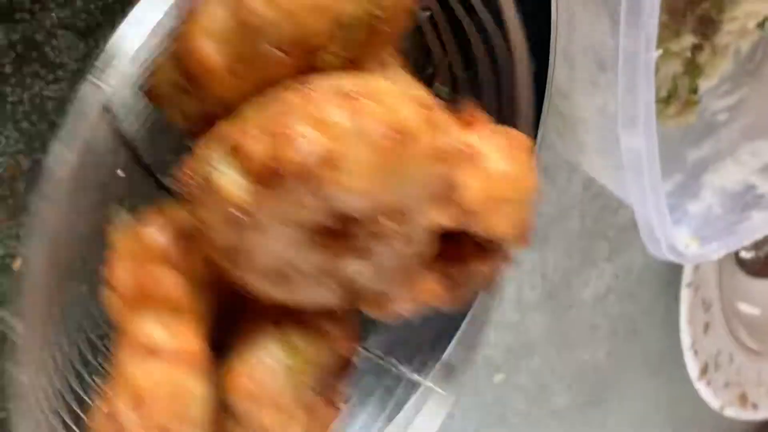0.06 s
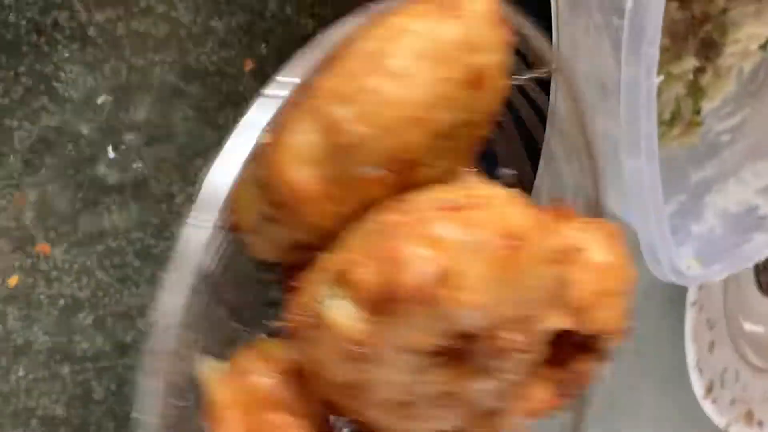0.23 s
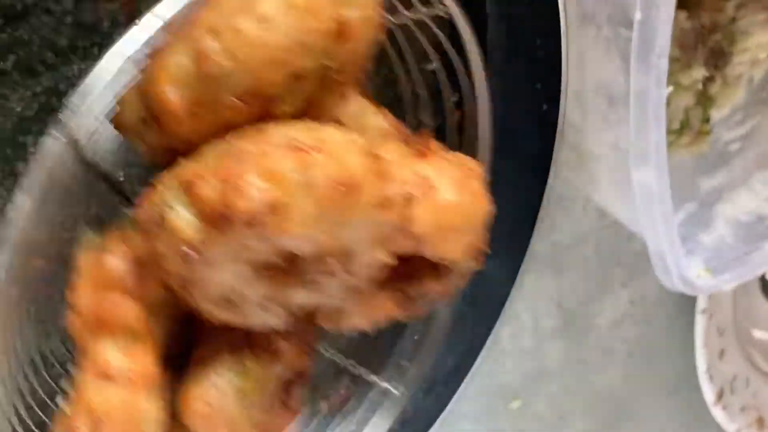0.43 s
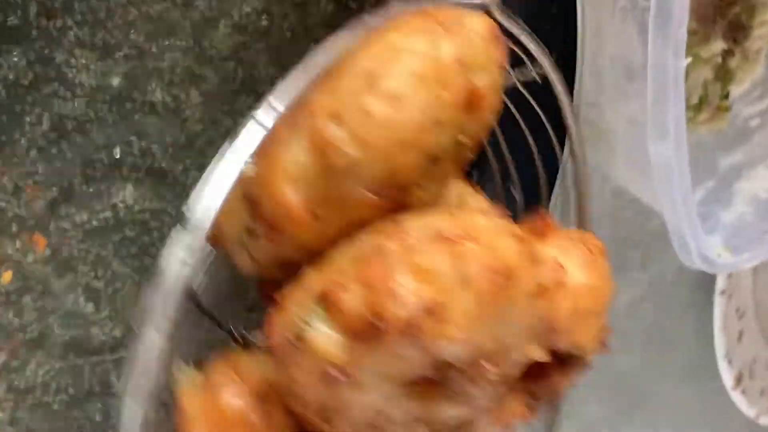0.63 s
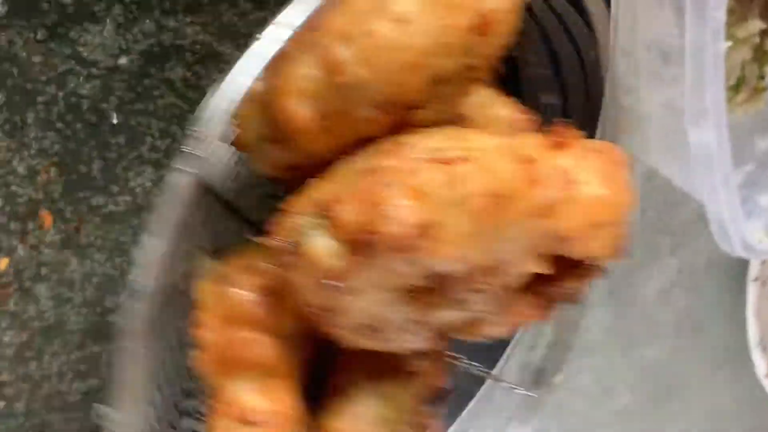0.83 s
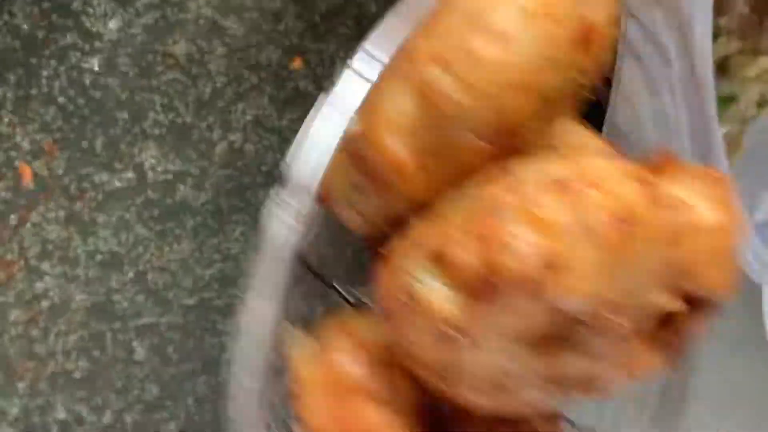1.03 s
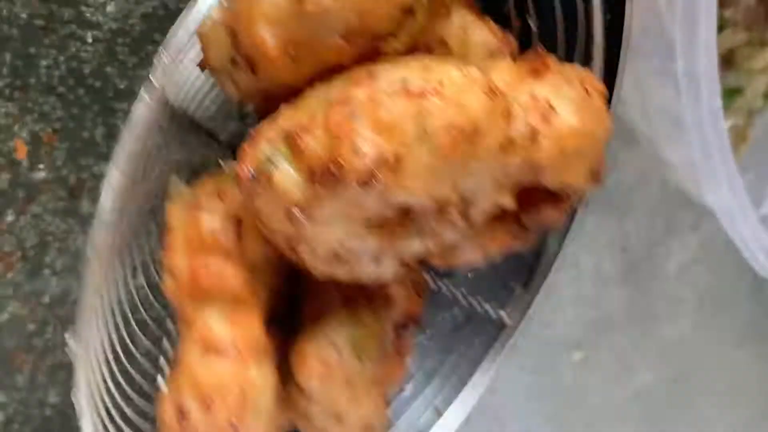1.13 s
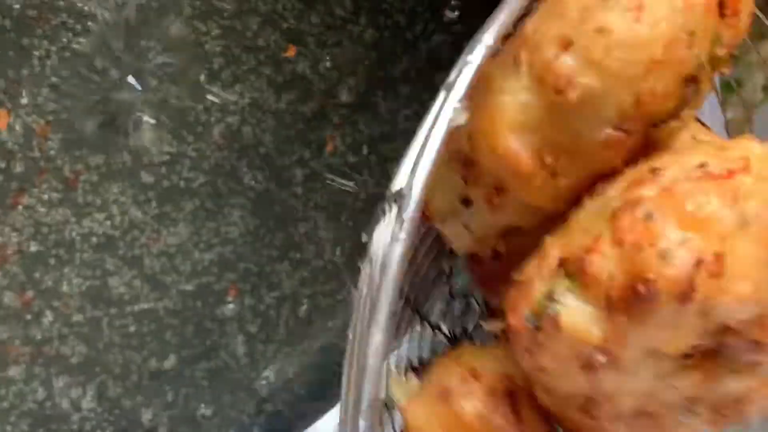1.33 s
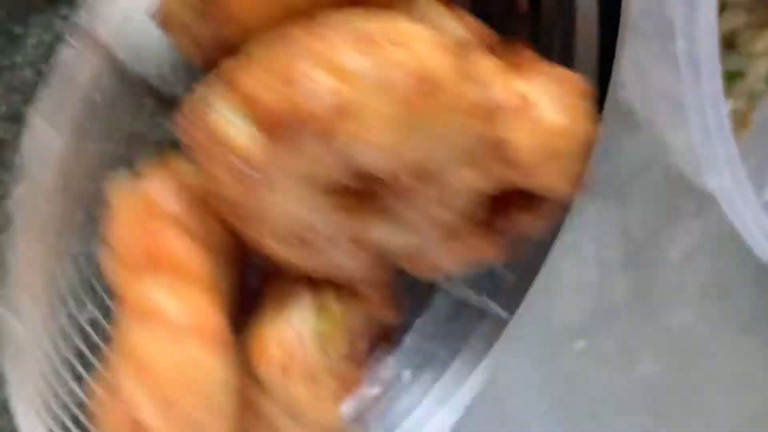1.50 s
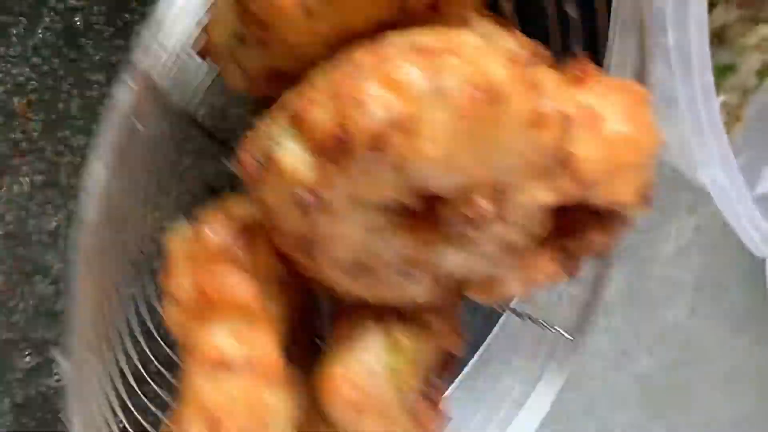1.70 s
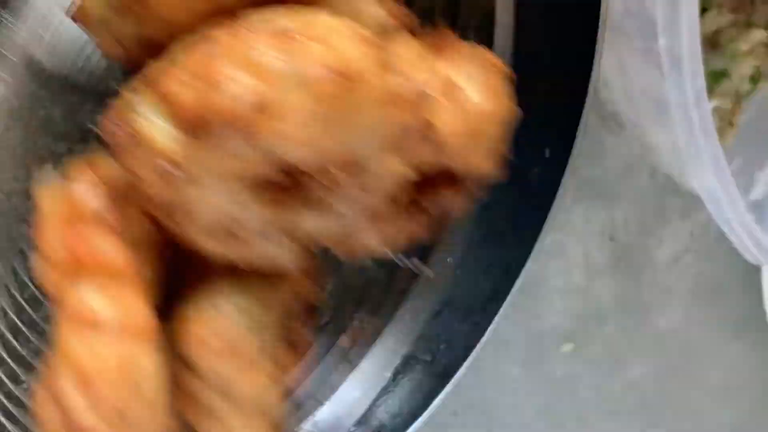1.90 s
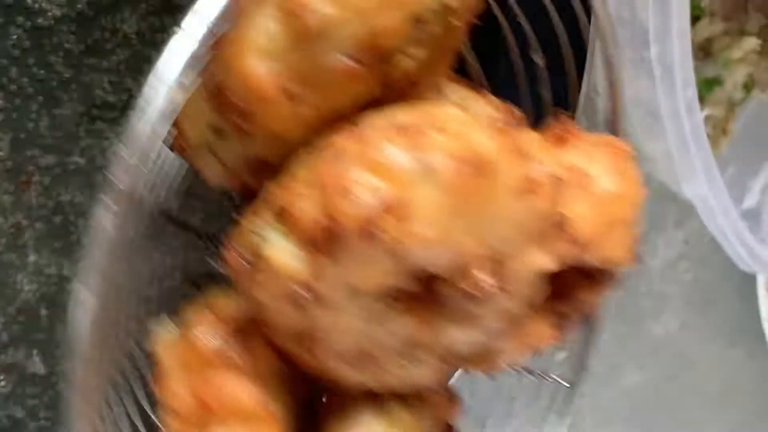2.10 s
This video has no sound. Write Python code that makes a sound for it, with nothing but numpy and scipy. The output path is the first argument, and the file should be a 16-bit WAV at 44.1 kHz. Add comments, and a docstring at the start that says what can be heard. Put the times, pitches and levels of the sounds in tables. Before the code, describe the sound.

A wire strainer clanks on a frying pan's rim at about 0.2 seconds, close by, then chatters and settles by 0.5 seconds, ringing briefly with a small kitchen's echo. A quiet low rush, probably the burner, runs throughout. Faint oil hiss swells around 0.9 seconds, and a short, soft rustle comes at 1.4. Near 1.9 seconds a faint thin whine grows slightly and sinks back.

```python
"""A small kitchen, heard by two close microphones: a low rush, probably the burner, and hissing oil.
At 0.2 s a wire strainer full of fritters knocks on the rim of a frying pan, chatters and settles.
The pan rings low, the wires ring high, and the room carries both for a moment.
The hot oil swells now and then from about 0.9 s, and at 1.4 s comes one brief rustle.
Near the end, a thin whine in the rush grows a little louder and sinks back."""
import sys
import numpy as np
from scipy import signal
from scipy.fft import rfft, irfft, next_fast_len
from scipy.io import wavfile
from scipy.ndimage import uniform_filter1d

SR = 44100
rng = np.random.default_rng(int(sys.argv[2]) if len(sys.argv) > 2 else 0)


def log_audio(samples):
    """Write samples as a 16-bit WAV file to the path given in sys.argv[1]."""
    # one column per channel
    frames = np.atleast_2d(samples).T
    # limit to full scale, then quantise
    limited = np.clip(frames, -1, 1)
    pcm = np.round(limited * 32767).astype(np.int16)
    wavfile.write(sys.argv[1], SR, pcm)


N = 94815

# each knock of the strainer on the pan (time [s], pan gain [dB], wire gain [dB], crack gain [dB])
KNOCKS = [(0.1993, -1.5, 2, 4), (.2025, -12, 0, -3), (0.2106, 2, -3.5, -3), (.2185, 4, -8, -12),
          (.2295, -4, -16, -22), (0.2648, -3, -2, -2), (.2755, -2.5, -16, -24), (.295, -15, -9, -21),
          (.305, -7, -17, -24), (.316, -7.5, -18, -21), (.33, -10.5, -16, -24), (.353, -20, -20, -30),
          (0.4, -12.5, -14.5, -14), (0.418, -20, -25, -30), (0.444, -19, -32, -38), (.471, -18.5, -25, -38)]
# the pan's ringing tones; a fade time is how long a sound takes to drop by 60 dB
# (pitch [Hz], relative level [dB], fade time [s])
PAN_TONES = [(320, -17, .42), (530, -11, .35), (607, -8, .3), (692, -10.5, .38), (824, -12, .28),
             (885, -14, .36), (969, -11, .25), (1105, -7, .18), (1170, -8, .3), (1230, -3, .12),
             (1405, -9, .22), (1498, -3, .28), (1564, 0, .25), (1625, -4, .22), (1657, -2, .22),
             (1683, -2, .22), (1818, 0, .18), (1841, 1, .14), (2062, -2, .2), (2083, -6, .26)]
# tones of the strainer's wires and rim (pitch [Hz], relative level [dB], fade time [s])
WIRE_TONES = [(2261, -5, .23), (2342, -2, .28), (2505, 0, .26), (2628, -6, .55), (2945, -10, .25),
              (3284, -7.5, .48), (3585, -7, .45), (3828, -9, .4), (3978, -5, .42), (4174, -4, .2),
              (5400, -11, .4), (5787, -2, .22), (6108, 1, .2), (6421, 0, .23), (6713, -4, .19),
              (7935, -11, .35), (10341, -2, .18), (11500, -4, .11)]
# bright, short pings of the rim (pitch [Hz], relative level [dB], fade time [s])
PING_TONES = [(4150, -7, .04), (4670, -3, .04), (5800, -2, .045), (6170, -2, .035), (8370, -6, .04),
              (8610, -6, .035), (11190, -5, .025), (11480, -2.5, .028), (15330, -13, .025)]
# colour (balance of low and high) of the pan's many weak tones (frequency [Hz], relative level [dB])
PAN_WEAK_COLOUR = [(50, -58), (110, 0.5), (230, -21), (330, -8), (450, -6), (700, -0.5), (900, -8),
                   (1200, 1.5), (1330, -6.5), (1650, 5), (1800, 0), (1950, -2.5), (2100, -4.5),
                   (2500, -9.5), (3000, -14), (3600, -11.5), (6000, -15.5), (15000, -26)]
# colour of the wires' many weak tones (frequency [Hz], relative level [dB])
WIRE_WEAK_COLOUR = [(500, -2.5), (1600, 21), (3050, -3.5), (3600, 19), (4650, -16), (5100, 14), (6000, 12),
                    (7400, 0), (8500, -29), (10100, 16), (11300, 6), (12000, -19), (13700, 0), (15500, -12)]
# colour of the crack that starts each knock (frequency [Hz], relative level [dB])
CRACK_NOISE = [(500, -7), (2000, -5.5), (6000, 0.5), (10000, -4), (15500, 3.5)]
# colour of the kitchen's echo (frequency [Hz], relative level [dB])
ECHO_COLOUR = [(100, -0.5), (600, -4), (1600, -7.5), (5000, -5.5), (10000, 1.5), (15000, 2.5)]
# how long the echo lasts, from low to high (frequency [Hz], fade time [s])
ECHO_FADES = [(150, 0.44), (700, 0.52), (2000, 0.41), (6000, 0.38), (14000, 0.18)]
# strokes of the rustle (time [s], level [dB], rise time [s], fade time [s])
RUSTLE_STROKES = [(1.4323, -33.5, 0.0012, 0.027), (1.441, -39, 0.0011, 0.081), (1.453, -41, 0.0053, 0.25),
                  (1.476, -36.5, 0.005, 0.081)]
# colour of the rustle (frequency [Hz], relative level [dB])
RUSTLE_NOISE = [(100, 5), (400, 4), (1500, -1), (3500, 10), (4700, 1), (6500, 9.5), (8500, 2), (10500, 4),
                (15000, 2.5)]
# colour of the oil's hiss (frequency [Hz], relative level [dB])
OIL_COLOUR = [(500, -7), (2000, -2), (4000, -1), (5000, -2), (6600, 0), (7600, -5), (9000, -2), (10500, 1),
              (13500, 1), (15500, 1.5)]
# swells of the hiss (peak time [s], half-width [s], level [dB])
OIL_SWELLS = [(.94, 0.071, -51.5), (1.19, 0.014, -56), (1.87, 0.084, -57), (2.07, 0.056, -61)]
# colour of the steady rush (frequency [Hz], relative level [dB])
RUSH_COLOUR = [(25, -28), (60, -4), (120, 0), (165, -1.5), (215, -12), (300, -7.5), (450, -15), (750, -9),
               (1170, -12), (1270, -4.5), (1430, -6.5), (1620, -15), (1880, -15.5), (2200, -28),
               (2850, -25), (3350, -32), (3850, -18), (4350, -22), (4800, -38), (15000, -55)]
# tones of the whine (pitch [Hz], level [dB], peak time [s], half-width [s], swell [dB])
WHINE_TONES = [(1254, -59.5, 1.9, .1, 4), (1402, -59.5, 1.91, .09, 5), (1445, -64, 1.9, .1, 4),
               (3800, -75, 2.05, .045, 11)]
# the part of a sound that differs between the microphones (frequency [Hz], relative level [dB])
STEREO_SPREAD = [(100, -20), (300, -11), (600, -6), (1100, -2), (1500, -7), (2800, -5), (4500, -11),
                 (15000, -11)]
# how far the left microphone is ahead of the right (frequency [Hz], phase [radians])
LEFT_LEAD = [(0, 0), (200, -.1), (600, -.8), (1200, -1.2), (1500, 0), (1900, 0), (2500, 1.6), (3600, 1.5),
             (4750, 3.14), (6900, 6.28), (15300, 18.85), (22050, 28.9)]
# how much louder the left microphone is (frequency [Hz], left minus right [dB])
LEFT_LOUDER = [(100, 1.5), (400, 3), (900, -0.5), (1200, 2.5), (1700, -2.5), (2400, 1), (5000, -0.8),
               (15000, 0.5)]

PAN_DB, PAN_WEAK_DB, PAN_WEAK_FADE_S, PAN_RISE_S = -30.5, -20.5, 0.19, 0.0011
WIRE_DB, WIRE_WEAK_DB, WIRE_WEAK_FADE_S, WIRE_RISE_S = -33.5, -21.5, 0.085, 0.0007
PING_DB, CRACK_DB, CRACK_FADE_S = -18.5, -16.5, 0.035
JOLT_CYCLES, SCATTER_DB = 0.08, 4
ECHO_DB, ECHO_RISE_S = -12.5, 0.096
OIL_DB, OIL_GRAIN = -56.5, 0.11
RUSH_DB, HUM_DB, HUM_HZ = -46, -57, 117.5
WHINE_WAVER_HZ, TOP_HZ = 17, 15950


def clank(t):
    """Every knock starts with a crack and a ping of the rim, and sets the pan and the wires ringing."""
    pan = undb(PAN_WEAK_DB) * weak_tones(PAN_WEAK_COLOUR, PAN_WEAK_FADE_S, t, count=300)
    wires = undb(WIRE_WEAK_DB) * weak_tones(WIRE_WEAK_COLOUR, WIRE_WEAK_FADE_S, t, count=170)
    pan *= rise(t, PAN_RISE_S)
    wires *= rise(t, WIRE_RISE_S)
    crack_noise = noise(CRACK_NOISE)
    crack_shape = undb(CRACK_DB) * fade(t, CRACK_FADE_S) * rise(t, WIRE_RISE_S)
    out, pan_power, wire_power = np.zeros((2, N)), np.zeros(N), np.zeros(N)
    for start, pan_db, wire_db, crack_db in KNOCKS:
        i = int(start * SR)
        crack = crack_shape * np.roll(crack_noise, -i, axis=1)
        knock = undb(pan_db) * pan + undb(wire_db) * wires + undb(crack_db) * crack
        out[:, i:] += knock[:, :N - i]
        # a short push of energy for the strong tones
        pan_power += undb(pan_db) ** 2 * np.diff(rise(t - start, PAN_RISE_S) ** 2, prepend=0)
        wire_power += undb(wire_db) ** 2 * np.diff(rise(t - start, WIRE_RISE_S) ** 2, prepend=0)
    out += undb(PAN_DB) * ring(PAN_TONES, t, pan_power)
    out += undb(WIRE_DB) * ring(WIRE_TONES, t, wire_power)
    return out + undb(PING_DB) * ring(PING_TONES, t, wire_power)


def ring(tones, t, power):
    """Each knock feeds the metal's tones and jolts them out of step; each fades at its own rate."""
    out = 0
    for hz, db, fade_s in tones:
        kept_per_sample = np.exp(-2 * np.log(1000) / (fade_s * SR))
        energy = signal.lfilter([1], [1, -kept_per_sample], power)
        jolt = JOLT_CYCLES * np.cumsum(drift(60) * power / (energy + 1e-4))
        out += undb(db) * np.sqrt(energy) * np.sin(2 * np.pi * (hz * t + jolt + rng.random()))
    return out


def weak_tones(points, fade_s, t, count):
    """Struck metal also rings with many weak, scattered tones, a little different at each microphone."""
    spectrum = np.zeros((2, N // 2 + 1), complex)
    place = (np.arange(count) + rng.random(count)) / count
    hz = TOP_HZ * place ** 2  # low tones lie closer together
    strength = undb(at(points, hz) + SCATTER_DB * rng.uniform(-0.52, 1, count)) * np.sqrt(place)
    shared, side = np.exp(2j * np.pi * rng.random((2, count)))
    pair = shared + undb(at(STEREO_SPREAD, hz)) * side * np.array([[1], [-1]])
    spectrum[:, (hz * N / SR).astype(int)] = strength * pair
    return unit(irfft(spectrum, N)) * fade(t, fade_s)


def kitchen_echo(sound, t):
    """Sound bounces around the room, builds up quickly and dies away, the highest notes first."""
    spectrum, hz = rfft(noise(ECHO_COLOUR)), np.fft.rfftfreq(N, 1 / SR)
    echo = 0
    for centre, fade_s in ECHO_FADES:
        band = at([(f, float(f == centre)) for f, _ in ECHO_FADES], hz)
        echo += irfft(spectrum * band, N) * fade(t, fade_s)
    echo = unit(echo * rise(t, ECHO_RISE_S)) / np.sqrt(N)
    return undb(ECHO_DB) * signal.fftconvolve(sound.mean(0)[None], echo, axes=1)[:, :N]


def rustle(t):
    """Two ticks and a short gritty slide, perhaps the fritters shifting on the wires."""
    power = sum((undb(db) * rise(t - start, rise_s) * fade(t - start, fade_s)) ** 2
                for start, db, rise_s, fade_s in RUSTLE_STROKES)
    return noise(RUSTLE_NOISE) * np.sqrt(power) * unit(np.exp(0.2 * drift(1200)))


def oil(t):
    """Hot oil hisses with a fine grain and swells now and then."""
    swells = sum(undb(db) ** 2 * bump(t - peak, width) for peak, width, db in OIL_SWELLS)
    hiss = noise(OIL_COLOUR) * np.sqrt(undb(OIL_DB) ** 2 + swells)
    return hiss * unit(np.exp(OIL_GRAIN * drift(1500)))


def rush(t):
    """A steady rush, probably the burner, with a low, wavering hum."""
    steady = undb(RUSH_DB) * noise(RUSH_COLOUR)
    hum = unit(np.sin(2 * np.pi * HUM_HZ * t + 1.6 * drift(7.96)))
    return steady + undb(HUM_DB) * hum


def whine(t):
    """Thin tones that waver in pitch and loudness; each swells once."""
    out = 0
    for hz, db, peak, width, swell_db in WHINE_TONES:
        cycles = np.cumsum(hz + WHINE_WAVER_HZ * drift(70)) / SR
        tone = unit(np.sin(2 * np.pi * cycles) * undb(3.5 * drift(25.45)))
        out += undb(db + swell_db * bump(t - peak, width)) * tone
    return out


def undb(db):
    """Turn decibels into a number to multiply by."""
    return 10 ** (np.asarray(db) / 20)


def unit(x):
    """Scale a signal to an average strength (rms) of 1."""
    return x / np.sqrt(np.mean(x ** 2))


def at(points, hz):
    """Read between the rows of a (frequency, value) table, giving each octave equal room."""
    table = np.array(points, float)
    return np.interp(np.log(np.maximum(hz, 1)), np.log(table[:, 0]), table[:, 1])


def colour(x, points):
    """Turn a sound's lows and highs up or down to follow a colour table."""
    size = 2 * next_fast_len(N)
    cepstrum = irfft(np.log(undb(at(points, np.fft.rfftfreq(size, 1 / SR)))))
    # fold the filter so that nothing comes out before it goes in
    cepstrum[1:size // 2] *= 2
    cepstrum[size // 2 + 1:] = 0
    return irfft(rfft(x, size) * np.exp(rfft(cepstrum)))[..., :N]


def noise(points):
    """Coloured noise of strength 1, partly different at the two microphones."""
    shared, side = rng.standard_normal((2, N))
    pair = shared + colour(side, STEREO_SPREAD) * np.array([[1], [-1]])
    return unit(colour(pair, points))


def drift(steps_per_s):
    """A smooth random wobble of strength 1."""
    hold = int(SR / steps_per_s)
    steps = np.repeat(rng.standard_normal(N // hold + 1), hold)
    return unit(uniform_filter1d(uniform_filter1d(steps, hold), hold)[:N])


def fade(t, fade_s):
    """Silent before time zero, then dropping by 60 dB every fade_s seconds."""
    return (t >= 0) * np.exp(-np.log(1000) * np.maximum(t, 0) / fade_s)


def rise(t, rise_s):
    """A soft start from time zero."""
    return 1 - np.exp(-np.maximum(t, 0) / rise_s)


def bump(t, half_width_s):
    """A smooth hill that peaks at time zero."""
    return np.exp(-(t / half_width_s) ** 2)


def scene():
    """The clank and its echo, over the sounds of the stove."""
    t = np.arange(N) / SR
    hit = clank(t)
    return hit + kitchen_echo(hit, t) + rush(t) + whine(t) + oil(t) + rustle(t)


def record(dry):
    """The two microphones differ in timing and level; the very highest notes are cut off."""
    size = 2 * next_fast_len(N)
    hz = np.fft.rfftfreq(size, 1 / SR)
    lead = np.interp(hz, *np.array(LEFT_LEAD).T)
    left = undb(at(LEFT_LOUDER, hz) / 2) * np.exp(0.5j * lead)  # each side takes half
    pair = irfft(rfft(dry, size) * np.array([left, 1 / left]))[:, :N]
    return signal.sosfilt(signal.ellip(12, 0.2, 80, TOP_HZ, fs=SR, output="sos"), pair)


dry = scene()
out = record(dry)
log_audio(out)
```